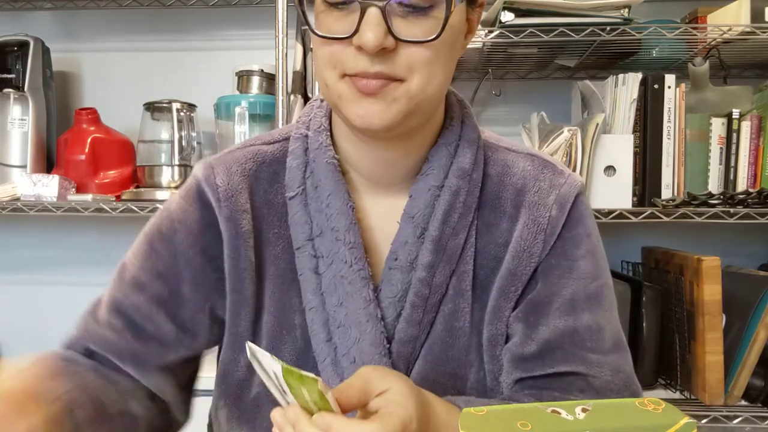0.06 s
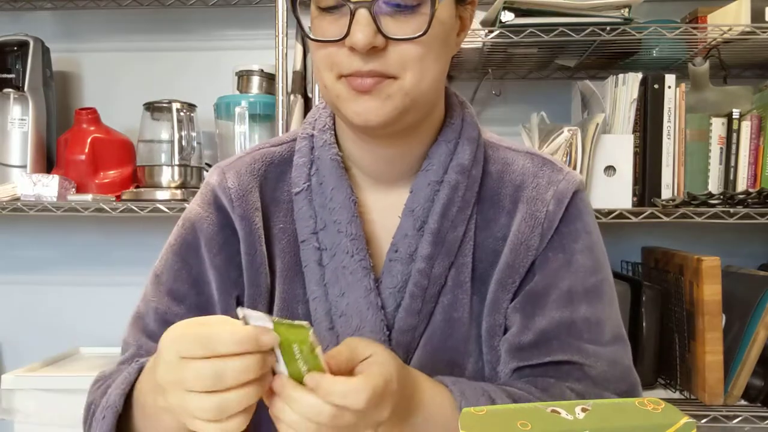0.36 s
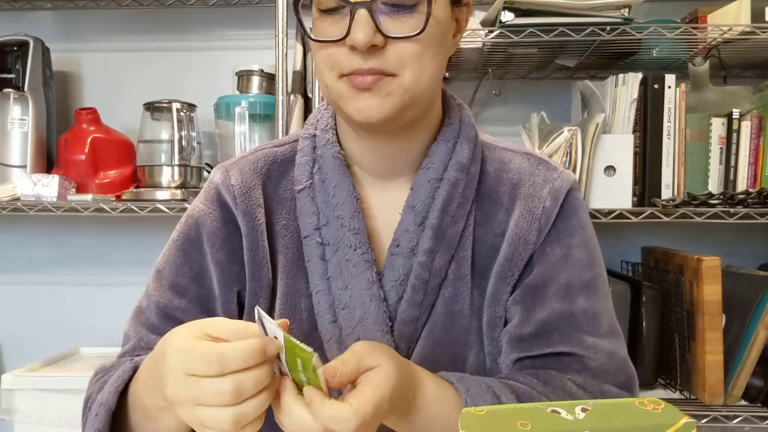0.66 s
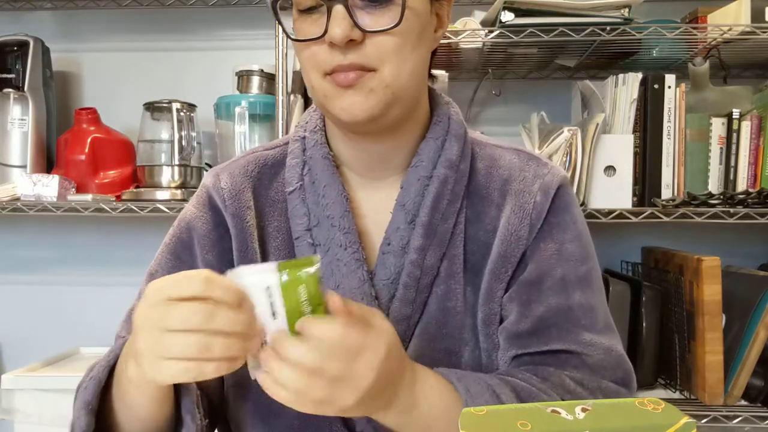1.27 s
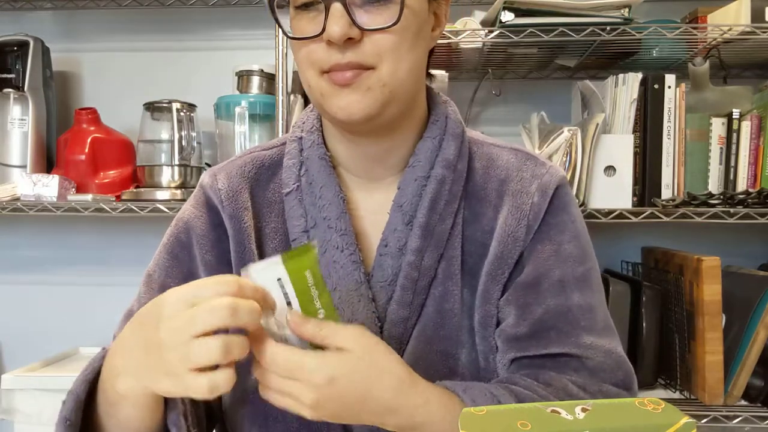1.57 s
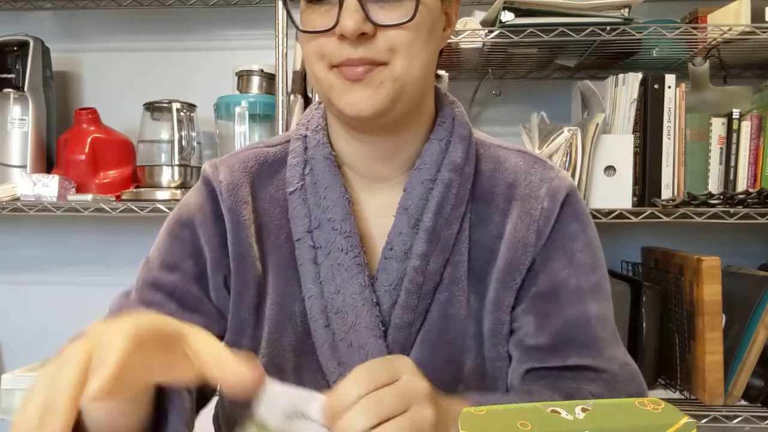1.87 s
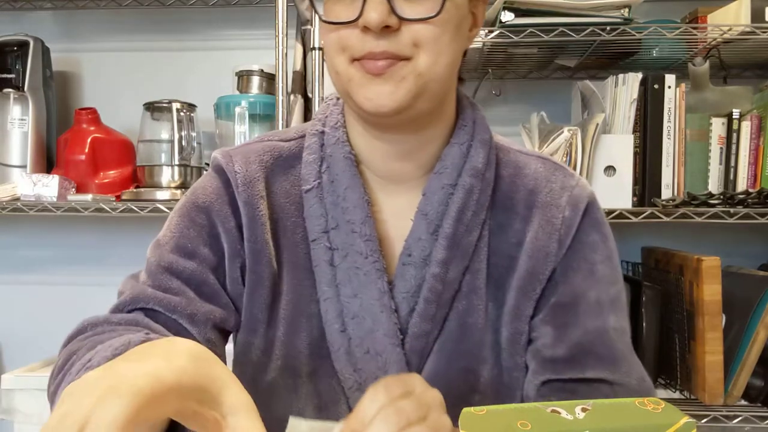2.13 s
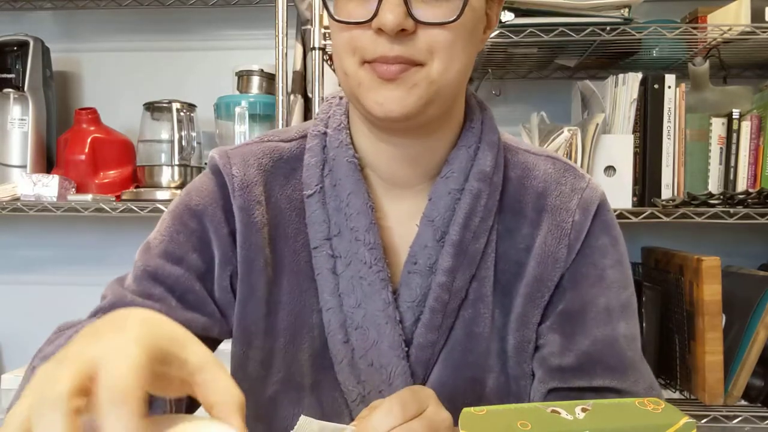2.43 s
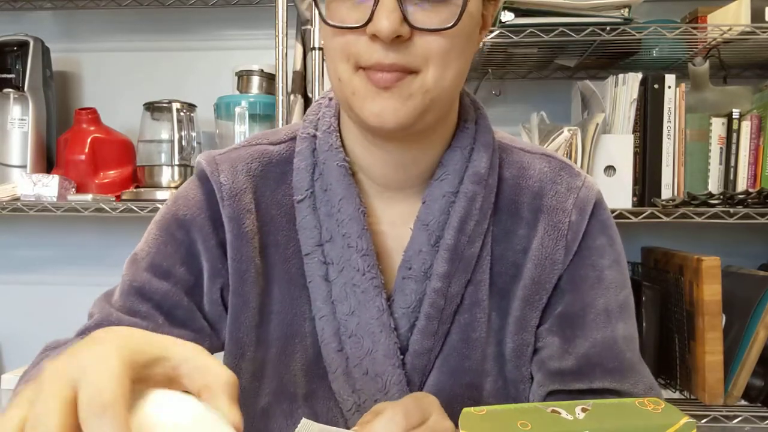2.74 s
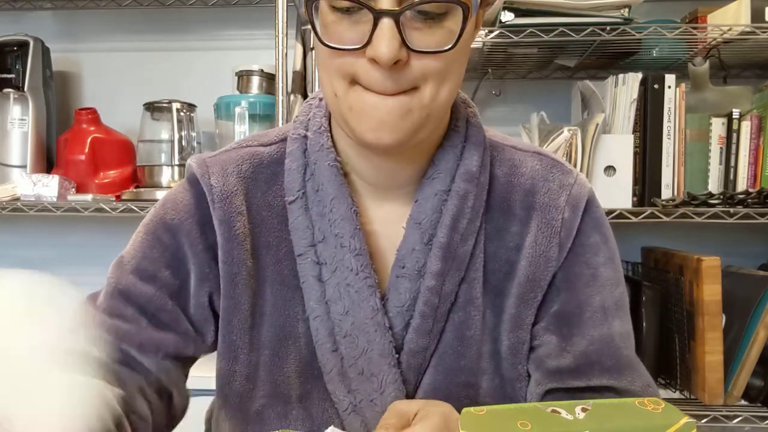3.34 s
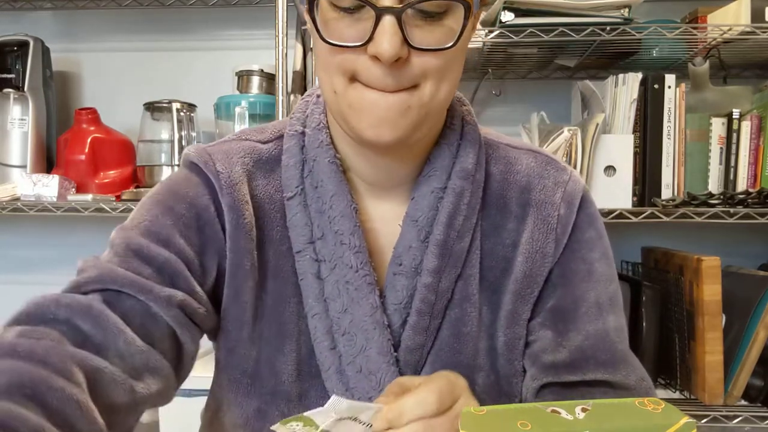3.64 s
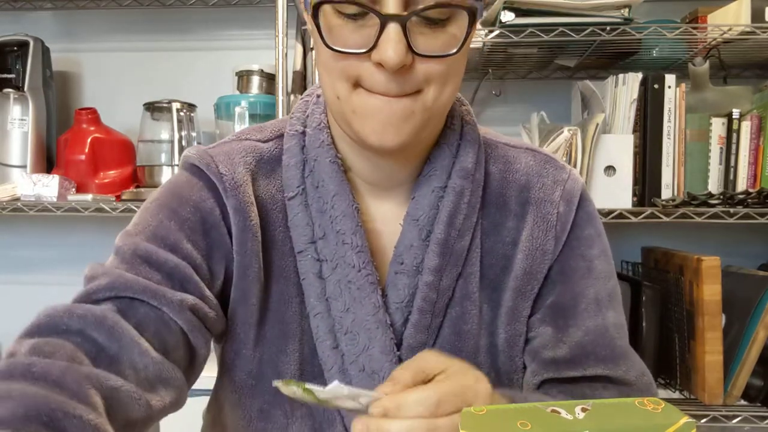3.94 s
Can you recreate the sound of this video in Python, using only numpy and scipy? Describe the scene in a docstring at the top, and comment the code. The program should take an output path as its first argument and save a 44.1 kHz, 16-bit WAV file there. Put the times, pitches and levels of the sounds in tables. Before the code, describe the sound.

China clinks and knocks as a pot and lid are set down, following light paper crinkling.

```python
"""A low hum fills a small room throughout. At a table, steel cutlery clatters to one side.
Fingers handle a small paper packet, whose creases snap and crinkle; sleeves brush the table.
A lidded china pot is put down and rocks, each knock ringing the china and the table top.
Its lid is worked loose with a gritty scrape and, last of all, laid on the table."""
import sys
import numpy as np
from scipy import signal
from scipy.fft import rfft, irfft
from scipy.io import wavfile

SR = 44100
rng = np.random.default_rng(int(sys.argv[2]) if len(sys.argv) > 2 else 0)


def inscribe(sig):
    """Save sig as 16-bit PCM at rate SR to the path in sys.argv[1].

    A 1-D sig is mono; a 2-D sig holds one channel per row.
    Samples are clipped to [-1, 1] before scaling.
    """
    pcm = np.round(np.clip(np.atleast_2d(sig).T, -1, 1) * 32767)
    wavfile.write(sys.argv[1], SR, pcm.astype(np.int16))


N = 176400
TIME = np.arange(N) / SR
CONTACT_S = 0.00041  # how long a blow takes to build up

# ringing tones of the china lid and pot: f/Hz, level/dB, fade time/s
LID = [(5127, -12, .08), (5230, -14, .06), (5500, -5, .035), (5552, 0, .045), (5610, -8, .06),
       (10300, -14, .05), (12510, -11, .05)]
POT = [(2140, -2, .05), (2350, -3, .033), (3150, -12, .04), (5320, -14, .08), (6450, -13, .05),
       (7770, -11, .05), (8020, -12, .05), (10020, -20, .05), (11350, -17, .06), (13000, -19, .05),
       (13350, -16, .04), (14900, -20, .06)]
# tone colour of paper noise: f/Hz, level/dB
PAPER = [(150, -20), (500, -0.5), (900, -12), (1600, 0), (2600, -3.5), (4000, 4), (6500, -2.5),
         (10000, -5.5), (15500, -6.5)]


def from_db(db):
    """Turn decibels into a gain."""
    return 10 ** (np.asarray(db) / 20)


def rms_one(x):
    """Scale a sound to an average strength (rms) of 1."""
    return x / np.sqrt(np.mean(x ** 2) + 1e-20)


def at_hz(points, hz):
    """Read between the rows of a table, with octaves evenly spaced."""
    f, v = np.transpose(points)
    return np.interp(np.log(np.maximum(hz, 1)), np.log(f), v)


def colour(x, spectrum, tilt_db=0):
    """Give noise a tone colour, made brighter by tilt_db per octave."""
    hz = np.maximum(np.fft.rfftfreq(x.shape[-1], 1 / SR), 10)
    gain = from_db(at_hz(spectrum, hz) + tilt_db * np.log2(hz))
    return rms_one(irfft(rfft(x) * gain, x.shape[-1]))


def wide_noise(size):
    """Stereo noise: left and right are alike in the bass and unrelated in the treble."""
    # how alike the two sides are: f/Hz, likeness (1 = the same)
    likeness = [(50, 0.94), (150, .93), (300, 0.45), (1200, 0.45), (3000, 0.05), (12000, 0.07)]
    mid, side = rfft(rng.standard_normal((2, size)))
    alike = at_hz(likeness, np.fft.rfftfreq(size, 1 / SR))
    return irfft(np.sqrt(1 + alike) * mid + np.sqrt(1 - alike) * side * [[1], [-1]], size)


def fade(t, fade_s):
    """Die away by 60 dB in the fade time."""
    return np.exp(-np.log(1000) * t / fade_s)


def add(out, s, sound):
    """Mix a sound in at s seconds."""
    i = int(s * SR)
    out[i:i + len(sound)] += sound[:N - i]


def high_pass(x, hz):
    """Cut the bass, as small objects give off little of it."""
    return signal.sosfilt(signal.butter(2, hz, "high", fs=SR, output="sos"), x)


def burst(spectrum, fade_s, tilt_db=0):
    """A dying puff of noise: vibrations too crowded to hear as separate tones."""
    t = TIME[:SR // 2]
    noise = colour(rng.standard_normal(len(t)), spectrum, tilt_db)
    return noise * fade(t, fade_s) * np.minimum(t / CONTACT_S, 1)


def struck(tones, hardness_db=0):
    """A struck object rings with its own tones; harder blows favour the high ones."""
    t = TIME[:SR // 2]
    ring = np.zeros(len(t))
    for hz, db, fade_s in tones:
        gain = from_db(db + hardness_db * np.log2(hz / 2360)) * rng.choice([-1, 1])
        ring += gain * np.sin(2 * np.pi * hz * t) * fade(t, fade_s)
    return ring * np.minimum(t / CONTACT_S, 1)


def grains(per_s, spread_db):
    """Random clicks of uneven size."""
    sizes = from_db(spread_db * np.minimum(rng.exponential(1, N), 4))
    return (rng.random(N) < per_s / SR) * sizes * rng.choice([-1, 1], N)


def swell(start, end):
    """One smooth rise and fall."""
    return np.sin(np.pi * np.clip((TIME - start) / (end - start), 0, 1))


def room_hum():
    """Low, steady noise with a few wavering tones in it."""
    # tone colour of the room's noise: f/Hz, level/dB
    noise_colour = [(25, 6.5), (60, -7.5), (105, -18.5), (160, 8.5), (200, -1), (265, 2), (450, -6.5),
                    (660, -9), (1500, -20), (4000, -30.5), (15000, -35)]
    # hum tones: f/Hz, level/dB
    tones = [(163, -63), (360, -71), (664, -71.5)]
    f, width_hz = np.fft.rfftfreq(N, 1 / SR), 6.2
    out = from_db(-55.5) * colour(wide_noise(N), noise_colour)
    for hz, db in tones:
        narrow_band = rfft(rng.standard_normal(N)) / (1 + ((f - hz) / width_hz) ** 2)
        out += from_db(db) * rms_one(irfft(narrow_band, N))
    return out


def cutlery():
    """Two steel pieces ring against each other and set their neighbours clashing."""
    # strikes: t/s, first piece/dB, second piece/dB, clash/dB
    hits = [(0.0, -22.5, -24.5, -22.5), (.007, -13.5, -33, -20), (.0145, -22.5, -33.5, -35),
            (0.0345, -24.5, -30, -19.5), (0.039, -31, -23, -23), (0.057, -42.5, -36.5, -23),
            (0.0951, -27, -21.5, -13.5), (0.1071, -39.5, -42.5, -25)]
    # ringing tones of the two pieces: f/Hz, level/dB, fade time/s
    first_piece = [(2422, -9, .11), (3040, -12, .1), (3747, -13, .14), (5680, -7, .1), (6584, -9, .16),
                   (7060, -9, .09), (7467, -8, .12), (8484, -9, .13), (8598, -8, .14), (9469, 0, .14),
                   (10028, -8, .11), (11850, -4, .1), (12940, -11, .1), (13945, -7, .13)]
    second_piece = [(3316, -9, .12), (3520, -10, .11), (4872, -12, .11), (5365, -3, .11), (5700, -6, .13),
                    (6120, -8, .12), (7084, -10, .11), (7740, -6, .13), (9200, -5, .07), (9315, -6, .12),
                    (11820, -11, .09), (12900, -9, .09), (14142, -7, .11), (15130, -10, .11)]
    # tone colour of the clash: f/Hz, level/dB
    clash_colour = [(150, -26), (450, -8), (1800, -8.5), (3300, 1), (4300, -4), (6000, -1), (9400, -1),
                    (10700, -8.5), (12500, -5), (15500, -1)]
    out, t = np.zeros(N), TIME[:SR // 2]
    hz = rng.uniform(4500, 15800, 260)  # the neighbours' many weak tones
    for s, first_db, second_db, clash_db in hits:
        spectrum = np.zeros(len(t) // 2 + 1, complex)
        phases = np.exp(2j * np.pi * rng.random(len(hz)))
        spectrum[(hz * len(t) / SR).astype(int)] = from_db(at_hz(clash_colour, hz)) * phases
        jingle = rms_one(irfft(spectrum, len(t))) * fade(t, fade_s=0.03)
        crack = from_db(6.5) * burst(clash_colour, fade_s=0.014)
        ring = from_db(first_db) * struck(first_piece) + from_db(second_db) * struck(second_piece)
        add(out, s, high_pass(ring, hz=680) + from_db(clash_db) * (jingle + crack))
    return out


def packet():
    """Creases snap and briefly ring a panel of paper, over tiny crinkles and rubbing fingers."""
    # rise and fall of the rustle: t/s, level/dB
    rustle = [(0.332, -67.5), (.42, -52.5), (0.519, -49.5), (.62, -65), (.69, -93), (.77, -52.5),
              (.84, -94), (.91, -46.5), (1.02, -81), (1.14, -42.5), (1.29, -60.5), (1.39, -42.5),
              (1.5, -57), (1.56, -43.5), (1.64, -54), (1.79, -43.5), (1.88, -61.5), (1.98, -55),
              (2.06, -78), (2.15, -55), (2.25, -100)]
    # snapping creases: t/s, level/dB, panel f/Hz, ring compared with snap/dB
    snaps = [(0.4274, -38.5, 4060, -10), (0.54, -23.5, 3900, 10.5), (0.5997, -35, 4060, 8.5),
             (0.884, -39.5, 1720, -3), (0.902, -21, 1630, -10), (0.947, -35.5, 1550, -5),
             (.955, -24.5, 4930, 12), (0.9649, -23.5, 3850, 6.5), (1.024, -33, 7550, 19),
             (1.0422, -44, 12000, 43.5), (1.0845, -22.5, 11300, 22.5), (1.117, -32, 2980, -10),
             (1.128, -35, 1890, 6.5), (1.1801, -25.5, 4120, -15), (1.211, -40, 1670, 9),
             (1.349, -40.5, 3000, 4), (1.3556, -38, 1960, 6.5), (1.376, -32, 3420, 7),
             (1.404, -38.5, 1770, 10), (1.537, -31.5, 5000, -12), (1.542, -37.5, 2010, 1),
             (1.581, -35, 3470, -15), (1.686, -34.5, 2960, 0), (1.691, -37.5, 1550, 2.5),
             (1.7536, -22, 1840, 4.5), (1.761, -29.5, 4460, -10)]
    # a panel's close tones, as multiples of its frequency
    panel_ratios = [1, 1, 1.075]
    ring_cycles = 8
    times, levels = np.transpose(rustle)
    crinkles = from_db(-10.5) * colour(grains(per_s=900, spread_db=7), PAPER)
    rub = from_db(-13) * colour(rng.standard_normal(N), PAPER)
    out = np.interp(TIME, times, from_db(levels), left=0, right=0) * (crinkles + rub)
    for s, db, hz, ring_db in snaps:
        panel = struck([(hz * k, ring_db, ring_cycles / hz) for k in panel_ratios])
        add(out, s, from_db(db) * (burst(PAPER, fade_s=0.011) + panel))
    return out


def sleeves():
    """Sleeves and hands brush the table in soft swells of noise."""
    # strokes: start/s, end/s, level/dB
    strokes = [(0.407, 0.573, -50), (0.677, 0.803, -64), (2.07, 2.296, -53), (3.195, 3.498, -55)]
    # tone colour of the brushing: f/Hz, level/dB
    brush_colour = [(30, 10.5), (80, -6), (150, 5.5), (300, -1.5), (600, -12.5), (2000, -20.5),
                    (8000, -28.5)]
    loudness = sum(from_db(db) * swell(start, end) for start, end, db in strokes)
    return loudness * colour(wide_noise(N), brush_colour)


def finger_ticks():
    """Fingertips tick against what they touch."""
    # small dry ticks: t/s, level/dB
    ticks = [(1.923, -57), (2.01, -48), (2.537, -31.5), (2.897, -53), (3.356, -53)]
    out = np.zeros(N)
    for s, db in ticks:
        add(out, s, from_db(db) * burst(PAPER, fade_s=0.011))
    return out


def pot_knocks():
    """Each knock of the rocking pot rings lid, pot and table top, with a hard clack."""
    # knocks: t/s, lid/dB, pot/dB, table/dB, clack/dB, hardness/(dB per octave)
    knocks = [(2.1099, -56, -54, -61, -44, -4), (2.2445, -57.5, -54.5, -52, -37.5, -5.5),
              (2.266, -51, -51, -64, -48.5, -4), (2.367, -56.5, -66, -58, -51.5, 6.5),
              (2.391, -35.5, -56, -22.5, -27.5, 1.5), (2.3931, -5.5, -25, -23.5, -17.5, 1),
              (2.403, -15, -25, -21.5, -20, 6), (2.4625, -25, -16.5, -21, -22.5, -2.5),
              (2.514, -31.5, -33, -28.5, -48, -1), (2.6245, -31.5, -18.5, -19.5, -29.5, -0.5),
              (2.688, -51, -58, -35.5, -46.5, -2.5), (3.02, -53.5, -45.5, -28, -33.5, 10.5),
              (3.0255, -40.5, -19.5, -20.5, -26, -5), (3.036, -49.5, -28, -46, -52, 0)]
    # tone colour of the clack: f/Hz, level/dB
    clack_colour = [(100, -12), (500, 0.5), (1200, 8.5), (1800, 4), (3300, 4), (4600, -5), (6000, -7),
                    (9000, -16.5), (13000, -12), (16000, -17.5)]
    out = np.zeros(N)
    for s, lid_db, pot_db, table_db, clack_db, hardness_db in knocks:
        china = from_db(lid_db) * struck(LID) + from_db(pot_db) * struck(POT, hardness_db)
        table = from_db(table_db) * table_top()
        clack = from_db(clack_db) * burst(clack_colour, fade_s=0.037, tilt_db=hardness_db)
        add(out, s, china + table + clack)
    return out


def table_top():
    """The table answers a blow with a few low tones and a dull thud."""
    # ringing tones of the table: f/Hz, level/dB, fade time/s
    tones = [(145, -13, 0.2), (264, -5, 0.1), (360.2, -10.5, 0.1), (499.4, -12, 0.066), (618, -6, 0.062),
             (856, -14.5, .06), (1000, -9.5, .04)]
    # tone colour of the thud: f/Hz, level/dB
    thud_colour = [(30, -21), (85, -29), (150, -4.5), (300, -4), (600, 5.5), (1000, -0.5), (1800, -25.5),
                   (4000, -27)]
    return high_pass(struck(tones), hz=140) + from_db(-5) * burst(thud_colour, fade_s=0.067)


def china_scrapes():
    """Grit under sliding china rasps, groans in the hollow pot and keeps the china ringing."""
    # slides on china and on the table: start/s, end/s, ring/dB, rasp/dB, groan/dB
    slides = [(2.22, 2.423, -69.5, -58.5, -66), (2.92, 3.01, -69, -67, -57.5),
              (2.981, 3.063, -62.5, -56.5, -39.5), (3.04, 3.16, -61, -47, -52),
              (3.122, 3.188, -56.5, -42, -64), (3.223, 3.344, -64.5, -53.5, -85),
              (3.351, 3.58, -73, -64.5, -78)]
    # tone colours of the rasp and the groan: f/Hz, level/dB
    rasp_colour = [(150, -8.5), (300, 12.5), (700, -5.5), (1100, -16), (1600, -15), (4000, -31.5),
                   (14000, -23.5)]
    groan_colour = [(500, -24), (800, -4.5), (1000, -1), (1200, -10), (1500, -23.5), (4000, -41)]
    grit = grains(per_s=4100, spread_db=2.5)
    china = struck(POT) + from_db(-5.5) * struck(LID)
    ring = rms_one(signal.fftconvolve(grit, china)[:N])  # every grain is a tiny blow
    rasp, groan = colour(grit, rasp_colour), colour(grit, groan_colour)
    out = np.zeros(N)
    for start, end, ring_db, rasp_db, groan_db in slides:
        scrape = from_db(ring_db) * ring + from_db(rasp_db) * rasp + from_db(groan_db) * groan
        out += swell(start, end) * scrape
    return out


def lid_set_down():
    """The lid lands on the table with its edge first, then drops flat."""
    # landings: t/s, ring/dB, table/dB, clack/dB, hardness/(dB per octave)
    landings = [(3.812, -14, -27, -7.5, 0.5), (3.832, -28.5, -42, -14.5, -5.5), (3.84, -45, -51, -25, -6)]
    # tone colour of the clack: f/Hz, level/dB
    clack_colour = [(100, -26.5), (450, -6.5), (1100, 0.5), (1700, 1.5), (2500, -0.5), (3300, 4),
                    (4700, -16), (5900, -6), (6700, -14), (9000, -17.5), (10300, -9.5), (11300, -24.5),
                    (12400, -4), (15000, -32)]
    out = np.zeros(N)
    for s, ring_db, table_db, clack_db, hardness_db in landings:
        ring = from_db(ring_db) * struck(LID, hardness_db)
        table = from_db(table_db) * table_top()
        clack = from_db(clack_db) * burst(clack_colour, fade_s=0.023, tilt_db=hardness_db)
        add(out, s, ring + table + clack)
    return out


def room_echoes():
    """Dense early echoes off table and shelves, then a tail that dies faster in the treble."""
    # how long the room rings: f/Hz, fade time/s
    fade_times = [(100, .45), (400, 0.49), (1500, 0.37), (5500, 0.36), (10000, 0.11), (16000, 0.2903)]
    t, first_echo_s = TIME[:SR * 3 // 4], 0.0039
    arrive = np.clip(t / first_echo_s - 1, 0, 1)
    early = wide_noise(len(t)) * fade(t, fade_s=0.13)
    edges_hz = np.geomspace(60, 19000, 9)
    tail = 0
    for low, high in zip(edges_hz, edges_hz[1:]):
        band = signal.butter(2, [low, high], "band", fs=SR, output="sos")
        fade_s = at_hz(fade_times, np.sqrt(low * high))
        tail += signal.sosfilt(band, wide_noise(len(t))) * fade(t, fade_s)
    echoes = from_db(-0.5) * rms_one(early * arrive) + from_db(-6) * rms_one(tail * arrive)
    return echoes / np.sqrt(len(t))


def in_room(x, echoes, echo_db, lag_s=0):
    """Add the room's echoes; a sound that reaches the left ear late seems to be on the right."""
    left = np.pad(x, (round(lag_s * SR), 0))[:N]
    return np.array([left, x]) + from_db(echo_db) * signal.fftconvolve(x[None], echoes, axes=1)[:, :N]


def scene():
    """Cutlery off to the side, the packet close by and china on the table, over the hum."""
    echoes = room_echoes()
    steel = in_room(cutlery(), echoes, echo_db=-2, lag_s=0.00018)
    paper = in_room(packet() + finger_ticks(), echoes, echo_db=-8)
    pot = in_room(pot_knocks() + china_scrapes(), echoes, echo_db=-4.5)
    lid = in_room(lid_set_down(), echoes, echo_db=-5, lag_s=0.00013)
    mix = room_hum() + steel + paper + sleeves() + pot + lid
    return mix * from_db([[1], [0]])  # the left side is slightly louder


def record(dry):
    """Round off the loudest peaks and cut the highest treble."""
    cutoff_hz = 15900
    return signal.sosfilt(signal.ellip(10, .2, 80, cutoff_hz, fs=SR, output="sos"), np.tanh(dry))


dry = scene()
out = record(dry)
inscribe(out)
```